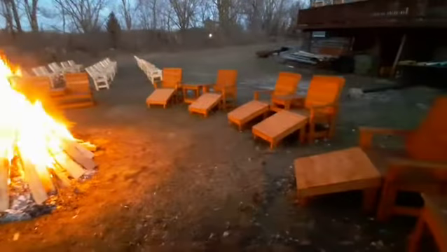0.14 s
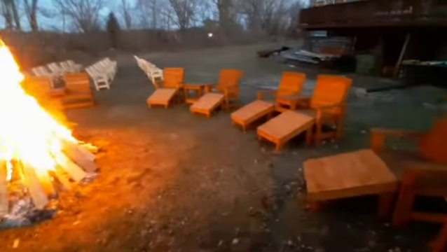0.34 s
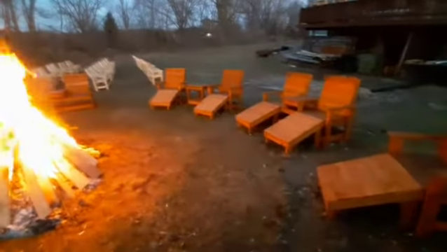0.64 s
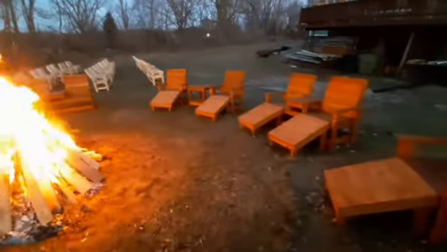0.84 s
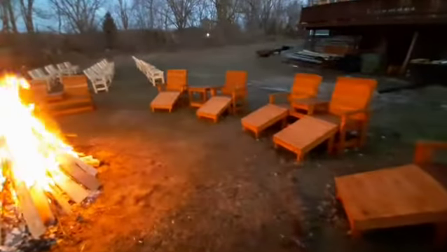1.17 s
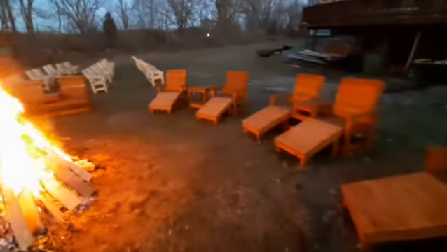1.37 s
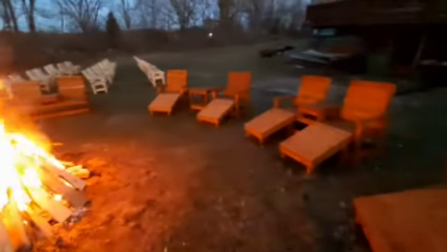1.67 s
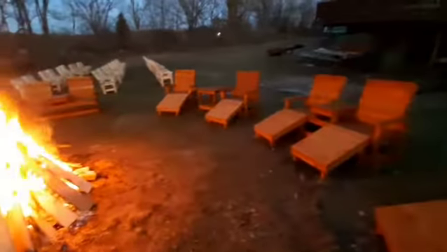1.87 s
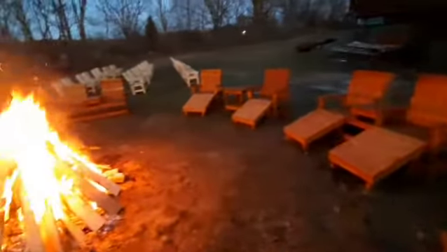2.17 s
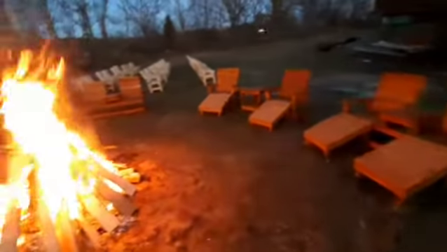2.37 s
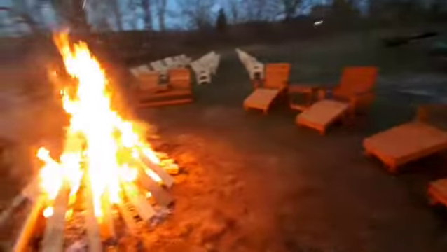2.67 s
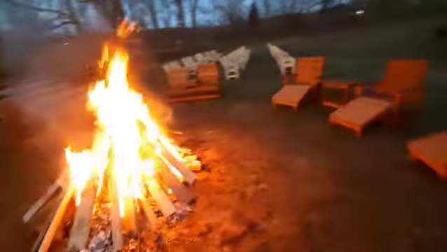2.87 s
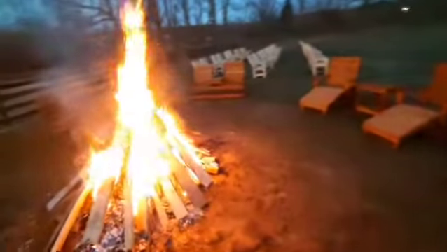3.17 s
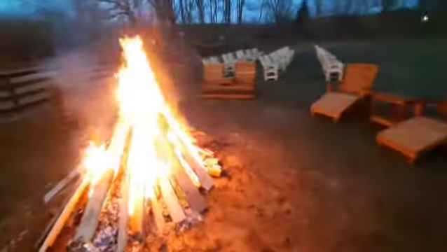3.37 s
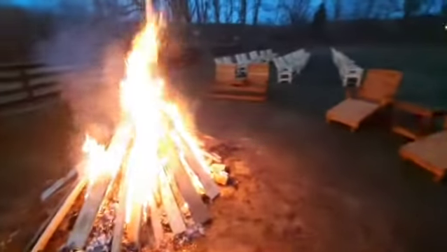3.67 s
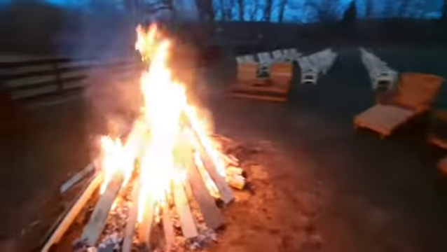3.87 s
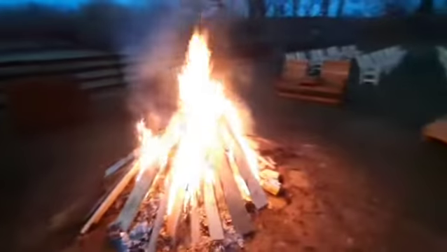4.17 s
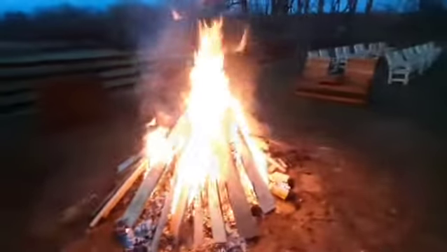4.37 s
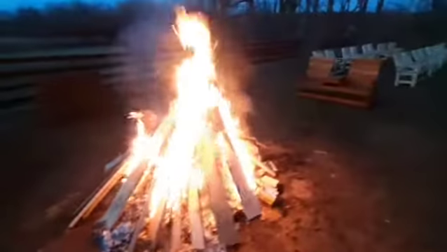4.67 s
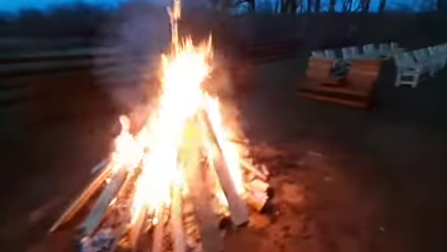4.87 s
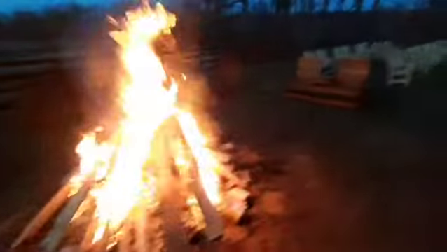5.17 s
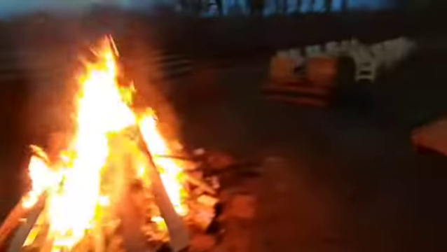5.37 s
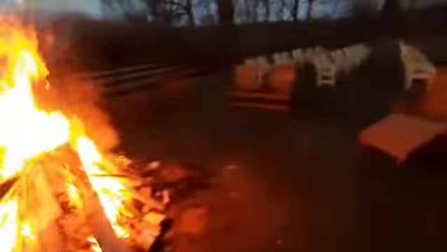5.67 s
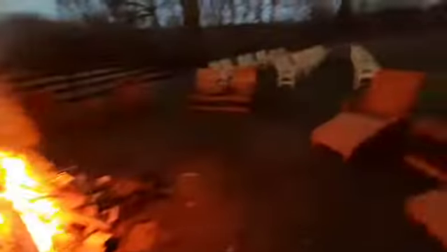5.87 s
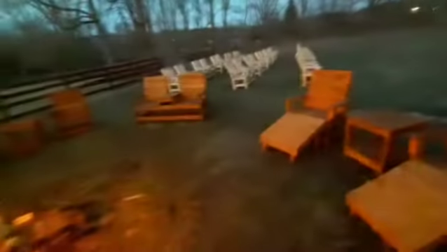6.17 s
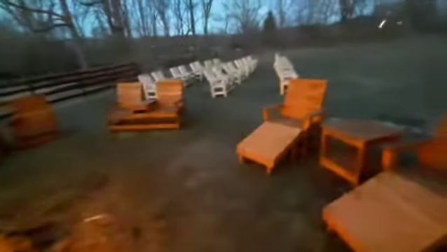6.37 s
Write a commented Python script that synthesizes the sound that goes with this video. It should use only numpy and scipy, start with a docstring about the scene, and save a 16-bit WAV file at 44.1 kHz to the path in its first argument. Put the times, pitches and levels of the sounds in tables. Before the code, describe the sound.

A tall bonfire of stacked planks burns on an open lawn, a few metres from a hand-held phone. The flames make a soft, low, fluttering rumble while the wood sizzles and ticks. Scattered sharp pops break through with a faint echo. The fire swells in the second half and the pops come more often, with the loudest crack about four seconds in and a quick cluster near the end.

```python
"""An open lawn, where a tall bonfire of stacked planks burns a few metres from a hand-held phone.
Burning gas rumbles and flutters underneath, swelling as the blaze grows. Moisture boils out of the
wood: it seethes in the gaps, spits, sizzles and ticks, and steam escapes in short gushes.
On top, bursting pockets in the wood pop sharply, echoed faintly by the ground, chairs and trees."""
import sys
import numpy as np
from scipy import signal
from scipy.fft import rfft, irfft, next_fast_len
from scipy.io import wavfile
from scipy.ndimage import uniform_filter1d

SR = 44100
rng = np.random.default_rng(int(sys.argv[2]) if len(sys.argv) > 2 else 0)


def master_out(mix):
    """Clip the mix to full scale and print it as 16-bit PCM to the path in sys.argv[1]."""
    frames = np.transpose(np.atleast_2d(mix))
    ceiling = np.clip(frames, -1, 1)
    pcm = np.round(ceiling * 32767).astype(np.int16)
    wavfile.write(sys.argv[1], SR, pcm)


N = 287720
TIME = np.arange(N) / SR


def undb(db):
    """Decibels to gain."""
    return 10 ** (np.asarray(db) / 20)


def unit(x):
    """Scale to rms 1."""
    return x / np.sqrt(np.mean(x ** 2))


def colour(x, points):
    """Minimum-phase EQ through (freq_hz, gain_db) points."""
    size = next_fast_len(N + 8192, True) // 2 * 2
    hz, db = np.transpose(points)
    bin_hz = np.arange(size // 2 + 1) * SR / size
    gain = undb(np.interp(np.log(bin_hz + 1), np.log(hz), db))
    cepstrum = irfft(np.log(gain))[:size // 2]
    cepstrum[1:] *= 2
    return irfft(rfft(x, size) * np.exp(rfft(cepstrum, size)))[..., :N]


def band(x, lo_hz, hi_hz, order=2):
    """Causal band-pass."""
    edges_hz = [lo_hz, min(hi_hz, SR / 2 - 1000)]
    return signal.sosfilt(signal.butter(order, edges_hz, "band", fs=SR, output="sos"), x)


def waver(rate_hz, depth_db):
    """A gain that glides to a new random level rate_hz times a second, by depth_db rms."""
    hold = int(SR / rate_hz)
    steps = np.repeat(rng.standard_normal(N // hold + 1), hold)
    return undb(depth_db * unit(uniform_filter1d(steps, hold)[:N]))


def turbulence(side_db):
    """Stereo white noise; more side makes it wider."""
    mid, side = rng.standard_normal((2, N))
    return mid + undb(side_db) * side * np.array([[1], [-1]])


def vent(peak_s, length_s, level_db, rise_share=0.46):
    """Power of a pocket of gas escaping: it opens, peaks and runs out."""
    corners_s = [peak_s - rise_share * length_s, peak_s, peak_s + (1 - rise_share) * length_s]
    return undb(level_db) ** 2 * np.interp(TIME, corners_s, [0, 1, 0])


# How hard the fire burns: time_s, level_db
BLAZE_CURVE = [(0.0, -74.5), (0.47, -71.5), (0.93, -75.5), (1.22, -73.5), (2.1, -71.5), (2.36, -68.5),
               (3.03, -68.5), (3.34, -65), (3.92, -66.5), (4.19, -63), (4.59, -65.5), (5.19, -59.5),
               (5.41, -62), (6.52, -65)]
def blaze(usual_db, growth, usual_blaze_db=-67.5):
    """Gain of a layer that rides the fire: usual_db at the usual blaze, plus growth dB per dB of blaze."""
    blaze_db = np.interp(TIME, *np.transpose(BLAZE_CURVE))
    return undb(usual_db + growth * (blaze_db - usual_blaze_db))


# Deep body of the flames: freq_hz, gain_db
RUMBLE_EQ = [(12, -46), (20, -26.5), (47, -3.5), (76, 1.5), (264, -14), (400, -29), (520, -52), (880, -120)]
# Soft whumps of gas catching all at once: peak_s, length_s, level_db
WHUMPS = [(1.01, 0.22, -56), (1.214, 0.19, -51), (1.37, 0.21, -55), (1.73, .1, -52), (2.124, 0.061, -45),
          (2.503, 0.1, -52.5), (2.712, .12, -52), (3.934, 0.13, -50), (4.215, 0.3, -53),
          (4.632, 0.18, -46.5), (5.836, 0.31, -47)]
def flame_rumble():
    """Burning gas makes a low bed that billows at random and flares now and then."""
    power = blaze(-52.5, growth=0.49) ** 2 + sum(vent(*whump) for whump in WHUMPS)
    body = unit(colour(turbulence(side_db=-19.5), RUMBLE_EQ))
    return body * np.sqrt(power) * waver(rate_hz=7, depth_db=0.8)


# Midrange of the flame tongues: freq_hz, gain_db
FLUTTER_EQ = [(150, -6.5), (350, 2), (600, 0), (1000, -6), (1500, -8), (3000, -38.5)]
def flame_flutter():
    """Tongues of flame flicker quickly above the rumble."""
    tongues = unit(colour(turbulence(side_db=-8), FLUTTER_EQ))
    return tongues * blaze(-67, growth=0.9) * waver(rate_hz=25, depth_db=2.5)


# Jets of gas blowing between the planks: peak_s, length_s, level_db
GAS_JETS = [(.28, .16, -83), (.58, 0.11, -66.5), (1.374, 0.31, -65.5), (1.61, 0.25, -65.5),
            (2.33, 0.31, -65), (2.5, .18, -66.5), (3.12, 0.17, -61.5), (3.47, 0.15, -63), (4.05, 0.42, -61),
            (4.36, 0.19, -58.5), (4.86, 0.085, -60), (4.98, 0.16, -59), (5.15, 0.076, -62.5),
            (5.654, 0.15, -64), (5.893, 0.34, -62), (6.52, 0.23, -58.5)]
# Resonances of the gaps: pitch_hz, width_hz, offset_db, growth_db_per_db
GAP_RESONANCES = [(1450, 640, -8.5, 0.63), (1540, 98, -7, 1.5), (2028, 236, -5.5, 2)]
def seething(usual_db=-60.5):
    """Gas resonates in the gaps between the planks; the narrow tones come forward as it blows harder."""
    power = blaze(-69, growth=0.43) ** 2 + sum(vent(*jet) for jet in GAS_JETS)
    drive_db = 10 * np.log10(power) - usual_db
    seethe = 0
    for pitch_hz, width_hz, offset_db, growth in GAP_RESONANCES:
        gas = unit(band(turbulence(side_db=1.5), pitch_hz - width_hz / 2, pitch_hz + width_hz / 2))
        gain = undb(usual_db + offset_db + growth * drive_db)
        seethe = seethe + gas * gain * waver(rate_hz=16, depth_db=1.24)
    return seethe


def ticking(ticks_per_band_s=110, spread_db=6.5, decay_s=0.0015):
    """Countless tiny bursts of moisture tick at random in three bright bands."""
    ticks = 0
    for lo_hz, hi_hz in [(1500, 8100), (5500, 16300), (10000, 21050)]:
        sizes = undb(spread_db * np.minimum(rng.exponential(size=N), 3.2))
        bursts = (rng.random(N) < ticks_per_band_s / SR) * sizes
        envelope = signal.lfilter([1], [1, -np.exp(-1 / (decay_s * SR))], bursts)
        ticks = ticks + band(envelope * turbulence(side_db=0), lo_hz, hi_hz)
    return unit(ticks)


# Coarse spitting and fine sizzle: freq_hz, gain_db
SPIT_EQ = [(1200, -15.5), (2400, 1), (3400, 1), (4500, -3.5), (6000, -8.5), (8000, -26), (12000, -11)]
SIZZLE_EQ = [(1000, -38), (3200, -24), (4500, -5), (5500, -4), (7000, -1), (12000, -7.5), (16000, 4.5)]
# Wet patches boiling up: peak_s, length_s, spit_db, brightness_db (sizzle over spit)
WET_PATCHES = [(0.553, 0.14, -76, 4), (0.796, 0.28, -77.5, 9), (1.158, 0.056, -63.5, -1),
               (1.312, 0.25, -68.5, 0.5), (1.586, 0.18, -69, -17), (2.318, 0.26, -71.5, 3),
               (3.16, .14, -66, -0.5), (3.447, 0.14, -64.5, -1), (3.667, 0.35, -64, 3),
               (3.915, 0.2, -68, 8.5), (4.25, 0.64, -67, 7.5), (4.61, 0.15, -67.5, 9),
               (4.857, 0.085, -59.5, 5.5), (4.977, 0.19, -62.5, -6), (5.745, 0.35, -69, 7.5),
               (5.916, 0.12, -60, -12), (6.254, 0.14, -61, -4), (6.52, 0.18, -61.5, -14)]
def boiling(hiss_db=1, tick_db=-6):
    """Moisture spits, sizzles and ticks out of the planks, riding the blaze and surging at wet patches."""
    spit_power = blaze(-73.5, growth=0.84) ** 2
    sizzle_power = blaze(-67, growth=0.88) ** 2
    for peak_s, length_s, spit_db, brightness_db in WET_PATCHES:
        spit_power += vent(peak_s, length_s, spit_db)
        sizzle_power += vent(peak_s, length_s, spit_db + brightness_db)
    spit = unit(colour(turbulence(side_db=0.5), SPIT_EQ)) * waver(rate_hz=60, depth_db=1.9)
    hiss = unit(colour(turbulence(side_db=0.5), SIZZLE_EQ)) * waver(rate_hz=33, depth_db=1.7)
    sizzle = undb(hiss_db) * hiss + undb(tick_db) * ticking()
    return spit * np.sqrt(spit_power) + sizzle * np.sqrt(sizzle_power)


# Broad, breathy tone of steam: freq_hz, gain_db
STEAM_EQ = [(120, -35), (250, 8.5), (700, 2.5), (2000, 5), (4500, -0.5), (7500, -7), (13000, -9),
            (16000, -13)]
# Short gushes of steam: start_s, peak_s, end_s, level_db
STEAM_GUSHES = [(0.235, 0.27, 0.5, -60.5), (1.137, 1.162, 1.3, -64), (1.244, 1.37, 1.52, -62),
                (2.107, 2.116, 2.29, -56.5), (2.662, 2.696, 2.696, -58.5), (2.687, 2.727, 2.782, -45),
                (4.265, 4.348, 4.38, -53.5)]
def steam():
    """Steam finds a way out, sputters and dies away."""
    flow = sum(undb(level_db) * np.interp(TIME, [start_s, peak_s, end_s], [0, 1, 0])
               for start_s, peak_s, end_s, level_db in STEAM_GUSHES)
    breath = unit(colour(turbulence(side_db=-6), STEAM_EQ))
    return breath * flow * waver(rate_hz=250, depth_db=1.15)


def lawn_echoes(send, near_s=0.024, far_db=-11, far_t60_s=0.51):
    """Ground and wood pile scatter the pops at once; chairs and trees return a faint, duller tail."""
    t = TIME[:SR]
    near_envelope = np.interp(t, [0.002, 0.005, near_s, near_s + 0.0063], [0, 1, 0.69, 0])
    near = rng.standard_normal((2, SR)) * near_envelope
    far_envelope = undb(-60 * t / far_t60_s) * (t > near_s)
    far = band(rng.standard_normal((2, SR)), 200, 4900, order=1) * far_envelope
    echoes = (unit(near) + undb(far_db) * unit(far)) / np.sqrt(SR)
    return signal.fftconvolve(send, echoes, axes=1)[:, :N]


def burst(x, level_db):
    """Give each channel the energy of two milliseconds at this level."""
    return x * undb(level_db) / np.sqrt(np.sum(x ** 2, axis=-1, keepdims=True) / (0.002 * SR))


def fracture(grain, decay_s, rupture=0.36, rupture_s=0.00044, attack_s=0.0001):
    """Wood gives way: a violent first rupture, then tiny breaks that die away."""
    t = np.arange(grain.shape[1]) / SR
    strain = rupture * np.exp(-t / rupture_s) + np.exp(-t / decay_s)
    attack = 1 - np.exp(-t / attack_s)
    spectrum = rfft(grain * strain * attack, 2 * len(t))
    flattened = spectrum / np.abs(spectrum) ** 0.75  # so short a burst spreads over all pitches
    return irfft(flattened)[:, :len(t)]


# Pockets bursting in the wood:
# start_s, knock_hz, knock_db, crack_hz, crack_db, snap_db, splinter_ms, echo_send_db
POP_CUES = [(0.9052, 1500, -72, 3320, -65, -56.5, 1.3, -13), (1.204, 1270, -37, 6960, -44.5, -51, 2.6, -12),
            (1.7845, 1250, -52, 7700, -48.5, -49.5, 2.2, -1),
            (2.118, 716, -42.5, 4700, -29, -37, 1.5, -8.5), (2.429, 1499, -68, 7000, -63, -60, 1.1, -16),
            (2.688, 1500, -53, 6200, -48, -44.5, 0.93, 0), (3.238, 1530, -48, 4560, -58, -62, 1.5, -16),
            (3.2805, 1500, -66, 7100, -59, -53, 1.1, -7), (3.893, 1500, -57, 7000, -46.5, -49, 1.1, -6),
            (4.066, 1500, -65, 6560, -47.5, -49, 0.6, -22),
            (4.0901, 1320, -23, 4360, -18.5, -17.5, 1.8, -16.5),
            (4.217, 1500, -63, 5430, -51.5, -60, 1.6, -17),
            (4.3452, 1080, -44.5, 4600, -41, -46, 1.9, -8.5),
            (4.5268, 1520, -56.5, 6940, -53, -52.5, 1.3, 0), (4.804, 1510, -62, 7200, -48, -51, 1.1, -14),
            (4.8132, 1510, -48.5, 4774, -47.5, -44, 1.1, -20),
            (4.8798, 1500, -48, 7200, -37, -36, 0.41, -30), (4.9614, 1670, -46, 3370, -37.5, -51, 1.3, -16),
            (5.1395, 1110, -44, 6860, -35, -42.5, 1.65, -21), (5.22, 970, -48, 7500, -54, -51, 0.87, -9),
            (5.269, 1510, -56, 6850, -47, -51.5, 1.3, -16), (5.304, 1500, -65, 6440, -52, -48.5, 0.9, -22),
            (5.4618, 1500, -64, 6500, -52.5, -51, 1.0, -10),
            (5.5102, 1490, -55, 3420, -47.5, -54, 2.1, -13),
            (5.6012, 1500, -70, 7400, -57, -53.5, 1.0, -16),
            (5.7644, 1500, -54, 6100, -47, -43.5, 3.5, -26),
            (5.8097, 1500, -66, 7100, -50, -45.5, 1.0, -22), (5.8225, 1500, -46, 6100, -46, -58, 1.2, -23),
            (5.833, 1490, -47, 3220, -42.5, -43.5, 1.5, -4.5),
            (5.85, 1560, -41.5, 7200, -44, -44, 2.4, -22),
            (5.8801, 1930, -31.5, 5300, -23.5, -29, 1.2, -25.5)]
def pops(size=2048, knock_span=1.41, thud_db=-7.5, ring_db=-5, ring_half_width=0.035, lag_s=0.00036):
    """A pocket ruptures: the plank knocks, the split cracks and rings, the fibres snap."""
    direct, send = np.zeros((2, 2, N + 2 * size))
    for start_s, knock_hz, knock_db, crack_hz, crack_db, snap_db, splinter_ms, send_db in POP_CUES:
        shared, left, right = rng.standard_normal((3, size))
        grain = shared + np.array([left, right])
        decay_s = splinter_ms / 1000
        split = fracture(grain, decay_s)
        push = fracture(grain, decay_s * 1.26)  # the heavy plank moves a little longer than the split
        knock = burst(band(push, knock_hz / knock_span, knock_hz * knock_span), knock_db)
        thud = burst(band(push, 420, 1000), knock_db + thud_db)
        ring = band(split, crack_hz * (1 - ring_half_width), crack_hz * (1 + ring_half_width), order=1)
        bite = band(split, 2800, 7600)
        crack = burst(burst(bite, 0) + burst(ring, ring_db), crack_db)
        snap = burst(band(split, 10200, 16200), snap_db)
        pop = knock + thud + crack + snap
        for ear in range(2):
            onset = int((start_s + ear * lag_s) * SR)  # the fire is to the left, so the right lags
            direct[ear, onset:onset + size] += pop[ear]
            send[ear, onset:onset + size] += undb(send_db) * pop[ear]
    return direct[:, :N], send[:, :N]


# The hiss pans as the phone turns to face the fire: time_s, right_minus_left_db
HISS_PAN = [(0, -0.2), (3.5, 0), (4.4, -3.5), (5.4, -3.5), (6.52, -3.5)]
def scene():
    """The mix: flames at the bottom, panned hiss above them, pops and their echoes in front."""
    direct, send = pops()
    pan_db = np.interp(TIME, *np.transpose(HISS_PAN))
    hiss = (seething() + boiling() + steam()) * undb(np.array([-pan_db, pan_db]) / 2)
    return flame_rumble() + flame_flutter() + hiss + direct + lawn_echoes(send)


# Tone shared by both microphone ports: freq_hz, gain_db
PORT_EQ = [(15, -15), (45, 1.5), (1300, 0), (1560, 2), (1800, 2), (2050, 2.5), (2650, -4), (3300, 0.5),
           (7700, 3), (8500, -14.5), (9600, -4.5), (10900, 3.5), (15000, 4.5), (16200, -13.5)]
# Balance between the ports: freq_hz, left_minus_right_db
PORT_TILT = [(200, -.5), (380, -1), (700, -3.5), (1300, -6), (2400, -7), (4400, -7), (8000, -6),
             (15000, -2.2)]
def record(dry, top_hz=16100):
    """The phone's two microphone ports each colour the sound in their own way, and the top is cut."""
    left = colour(dry[0], [(hz, db / 2) for hz, db in PORT_TILT])
    right = colour(dry[1], [(hz, -db / 2) for hz, db in PORT_TILT])
    low_pass = signal.ellip(10, 0.2, 80, top_hz, fs=SR, output="sos")
    return signal.sosfilt(low_pass, colour(np.array([left, right]), PORT_EQ))


dry = scene()
out = record(dry)
master_out(out)
```